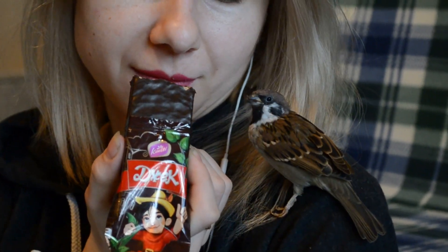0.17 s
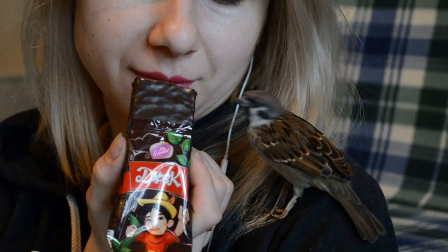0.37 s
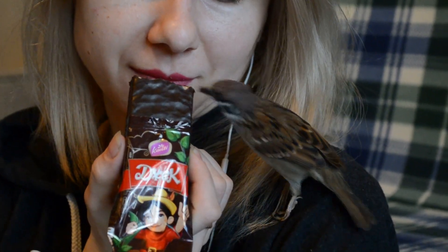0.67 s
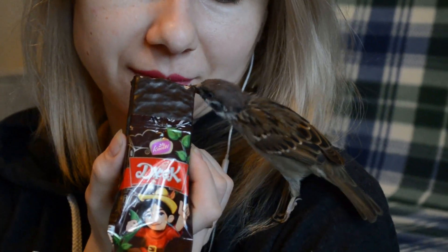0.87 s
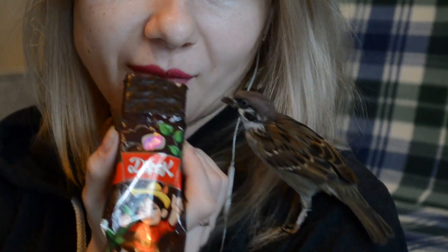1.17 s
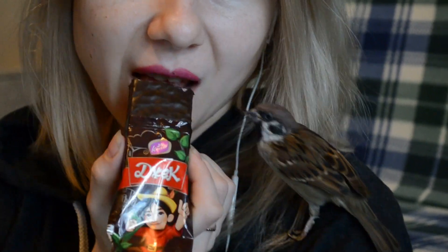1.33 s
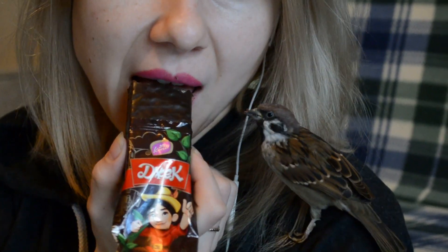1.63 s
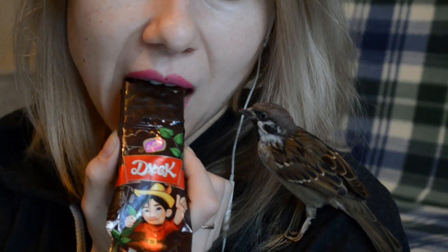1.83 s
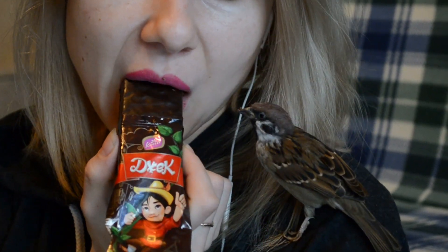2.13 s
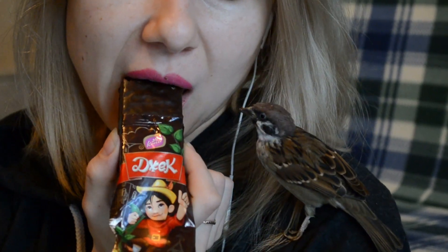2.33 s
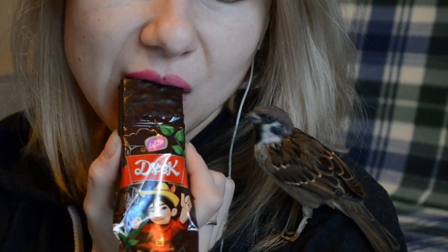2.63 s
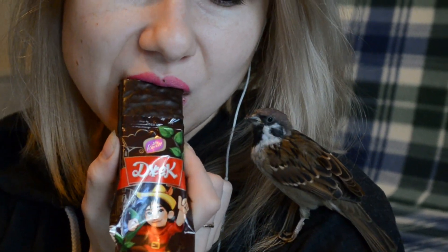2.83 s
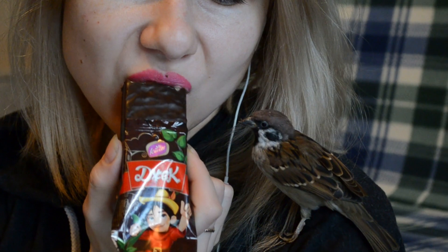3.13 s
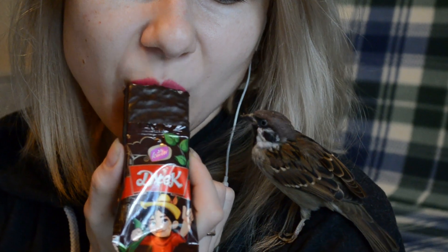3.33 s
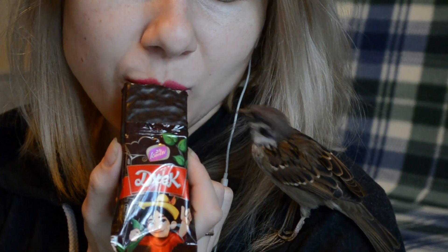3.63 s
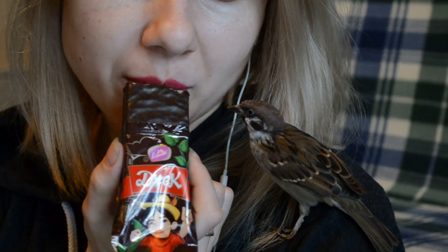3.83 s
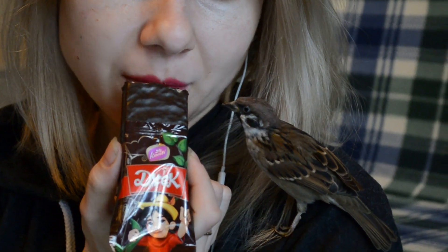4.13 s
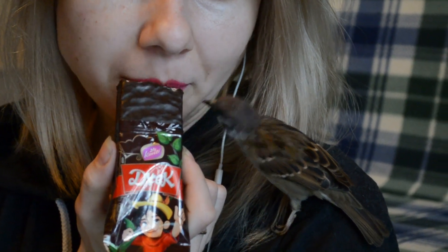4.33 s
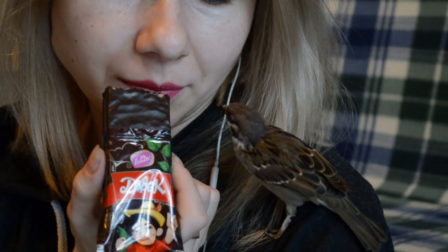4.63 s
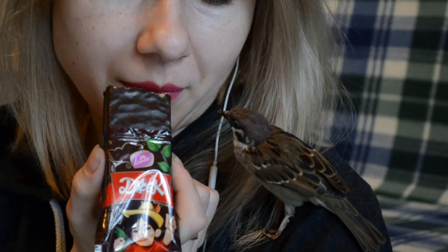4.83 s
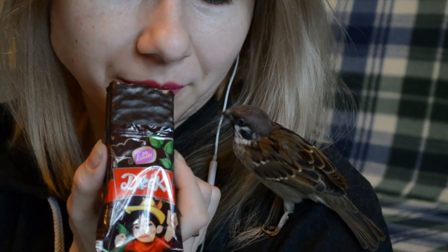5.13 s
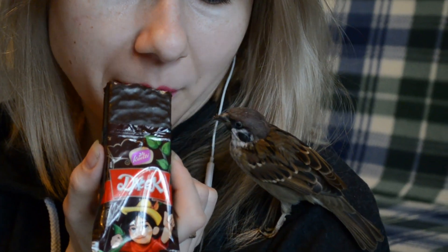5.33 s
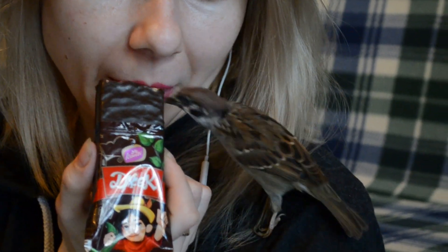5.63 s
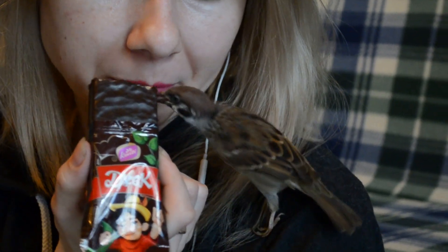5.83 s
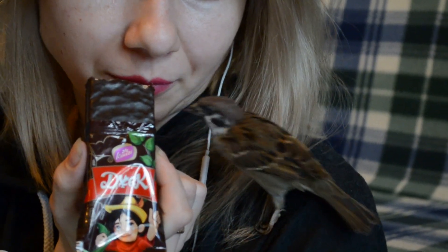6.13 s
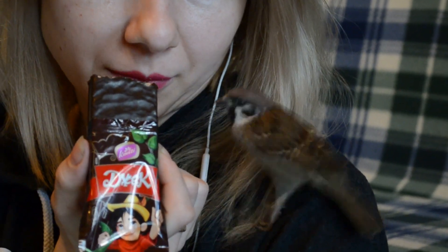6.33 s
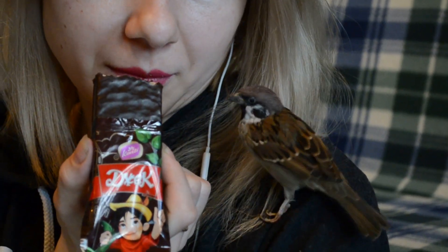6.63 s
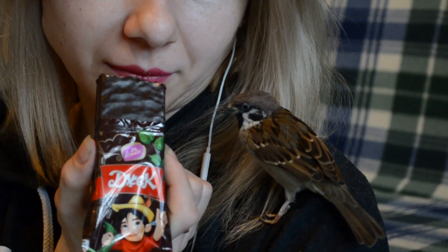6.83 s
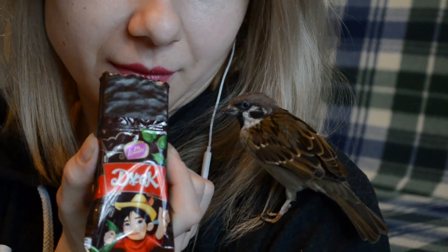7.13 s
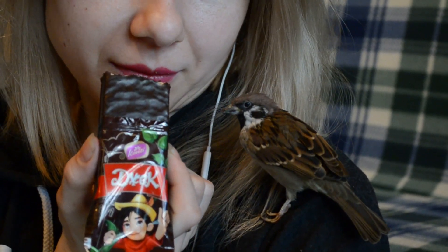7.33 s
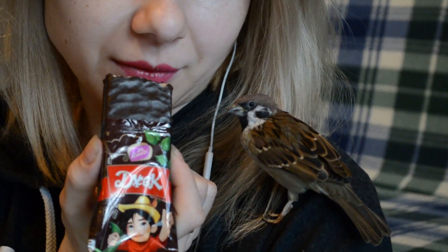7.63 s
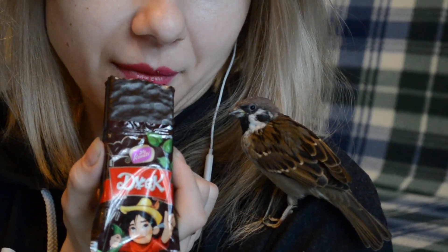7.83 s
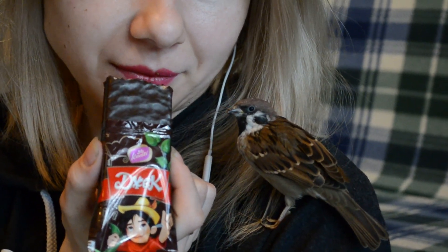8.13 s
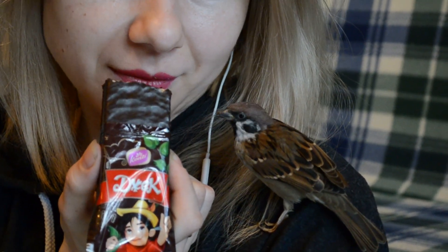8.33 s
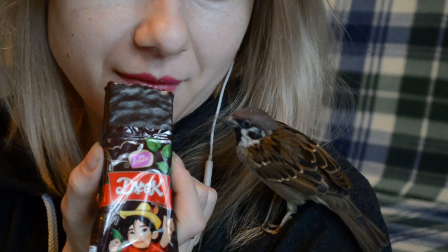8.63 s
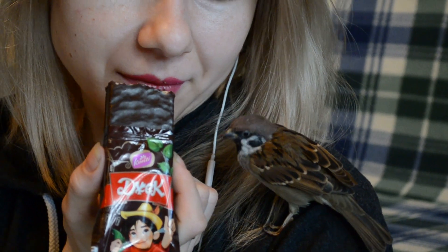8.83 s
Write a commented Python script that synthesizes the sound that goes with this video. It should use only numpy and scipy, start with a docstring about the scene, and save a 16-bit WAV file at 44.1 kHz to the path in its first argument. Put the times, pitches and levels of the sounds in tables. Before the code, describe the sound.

Sharp, high sparrow chirps sound up close in a small room, with soft beak clicks, a little foil crackle and a quiet hum.

```python
"""A sparrow in a small room

A tame sparrow chirps an arm's length away in a furnished room. Both halves of its voice box
(the syrinx) whistle at once and share one quick warble. Ticks of beak and foil and some duller
clicks fall between the chirps, over the rush and wandering whine of a small fan."""
import sys
import numpy as np
from scipy import signal
from scipy.fft import rfft, irfft, next_fast_len
from scipy.io import wavfile
from scipy.ndimage import uniform_filter1d

SR = 44100
rng = np.random.default_rng(int(sys.argv[2]) if len(sys.argv) > 2 else 0)


def pcm_store(signal):
    """Save signal as 16-bit PCM."""
    levels = np.round(np.clip(np.atleast_2d(signal), -1, 1) * 32767)
    wavfile.write(sys.argv[1], SR, levels.astype(np.int16).T)


N = 396459


def sparrow_chirps():
    """Nine chirps, each sung by a low and a high voice: the two halves of the voice box."""
    # Each voice after the chirp's opening, one list per chirp: time_s, pitch_hz, level_db
    low_voices = [
        [(1.362, 4056, -24.5), (1.377, 3242, -35), (1.39, 3457, -45), (1.4, 3996, -40.5), (1.41, 4150, -38.5),
         (1.421, 4260, -44)],
        [(2.722, 4186, -20), (2.738, 3347, -30.5), (2.749, 3674, -40.5), (2.772, 3680, -35.5), (2.8, 4080, -49)],
        [(3.256, 4102, -23), (3.268, 4010, -23), (3.285, 3954, -38)],
        [(4.716, 4103, -19), (4.726, 3653, -39.5), (4.737, 3380, -33), (4.77, 3550, -36), (4.782, 3713, -30.5),
         (4.795, 4056, -27), (4.815, 4260, -39)],
        [(5.035, 4450, -37.5), (5.05, 4270, -40), (5.06, 3935, -33), (5.068, 4590, -29), (5.074, 4400, -44),
         (5.087, 4970, -55), (5.092, 5500, -43)],
        [(6.313, 4220, -23), (6.322, 4260, -22.5), (6.33, 3780, -31.5), (6.338, 3288, -24.5),
         (6.349, 3554, -50), (6.375, 3466, -58.5), (6.41, 3790, -39.5)],
        [(6.82, 4000, -16.5), (6.83, 3024, -36), (6.85, 3235, -47.5), (6.865, 3670, -45), (6.88, 3300, -29)],
        [(8.475, 4355, -25.5), (8.5, 3810, -20), (8.51, 4126, -31), (8.52, 4132, -23.5), (8.533, 4350, -20.5),
         (8.55, 4800, -50)],
        [(8.71, 4283, -17), (8.731, 4350, -21.5), (8.742, 4340, -30), (8.75, 4260, -58)],
    ]
    high_voices = [
        [(1.351, 6250, -27), (1.362, 6430, -28), (1.371, 6480, -26), (1.374, 6200, -40), (1.378, 4300, -42),
         (1.402, 4050, -39.5), (1.415, 4320, -40)],
        [(2.7, 6100, -29), (2.717, 6340, -27), (2.728, 5290, -31), (2.745, 3890, -43), (2.775, 3900, -32),
         (2.795, 5120, -31), (2.81, 4500, -39), (2.825, 4680, -35.5), (2.84, 4650, -31.5)],
        [(3.243, 6330, -34.5), (3.26, 6050, -28), (3.275, 6120, -55.5)],
        [(4.692, 6600, -34.5), (4.703, 6000, -30), (4.714, 6450, -36.5), (4.722, 4400, -31.5),
         (4.74, 4000, -65), (4.755, 4270, -67), (4.774, 4300, -26), (4.783, 5290, -37), (4.795, 4590, -26),
         (4.81, 4330, -37.5)],
        [(5.037, 5950, -38.5), (5.06, 5690, -33), (5.07, 6400, -28), (5.074, 6500, -55), (5.085, 6370, -44),
         (5.092, 5450, -24), (5.103, 5080, -35.5), (5.12, 4940, -36)],
        [(6.304, 6170, -31), (6.32, 6250, -24.5), (6.328, 5210, -39), (6.345, 3970, -45), (6.38, 3920, -34.5),
         (6.392, 5190, -38), (6.4, 4280, -34), (6.41, 4200, -34)],
        [(6.799, 6350, -33), (6.812, 6310, -29), (6.823, 4780, -30.5), (6.84, 3950, -36.5),
         (6.854, 4030, -34.5), (6.866, 3637, -33.5), (6.874, 4260, -23), (6.878, 5130, -25.5),
         (6.885, 3960, -29), (6.897, 4780, -32)],
        [(8.467, 6490, -28.5), (8.48, 6230, -20), (8.495, 6340, -53), (8.527, 5900, -21), (8.538, 7150, -32),
         (8.548, 5930, -24.5), (8.563, 4350, -43)],
        [(8.7, 6050, -26.5), (8.715, 5920, -33), (8.73, 5660, -31), (8.742, 6200, -24), (8.757, 6530, -26.5),
         (8.766, 4950, -27.5), (8.777, 4470, -44)],
    ]
    # Each chirp's opening and tone colour (levels are relative to the voices):
    # start_s, arch_hz, overtone_db, sum_tone_db, undertone_db, air_db
    chirps = [(1.318, 4414, -11, -24.5, -29.5, -40.5), (2.679, 4376, -23.5, -26, -33, -40.5),
              (3.217, 4425, -31, -29, -38, -36), (4.67, 4406, -29.5, -29.5, -37.5, -39.5),
              (5.014, 4630, -31, -34.5, -32, -36), (6.279, 4380, -24.5, -25, -34.5, -38),
              (6.777, 4613, -29, -31.5, -33, -37.5), (8.442, 4720, -20, -24, -37.5, -38),
              (8.675, 4300, -19.5, -23, -45.5, -34)]
    # Each chirp's quick pitch swing: crest_s, rate_hz, slowing_s, stop_s, low_swing_hz, high_swing_hz
    warbles = [(1.356, 158, .05, 1.39, 310, 120), (2.7048, 165, .2, 2.74, 230, 200),
               (3.2485, 168, .1, 3.285, 260, 220), (4.6961, 160, .12, 4.735, 240, 230),
               (5.0517, 117, .31, 5.076, 150, 80), (6.3049, 180, .1, 6.345, 260, 200),
               (6.8066, 155, .047, 6.84, 260, 220), (8.472, 170, .09, 8.52, 250, 130),
               (8.7045, 155, .12, 8.75, 220, 110)]
    out = np.zeros(N + SR)
    for low, high, (start_s, arch_hz, *colour_db), warble in zip(low_voices, high_voices, chirps, warbles):
        first = int((start_s - .02) * SR)
        t = (first + np.arange(SR // 4)) / SR
        voices = two_voices(t, low, high, start_s, arch_hz, warble)
        out[first:first + len(t)] += mix_airflows(*voices, *colour_db)
    return out[:N]


def two_voices(t, low, high, start_s, arch_hz, warble):
    """The low voice pips, dips in level, then arches and swells; the high one joins. Both warble."""
    crest_s, rate_hz, slowing_s, stop_s, low_swing_hz, high_swing_hz = warble
    pip_hz, pip_db, dip_db = 4130, -48, -56
    join_hz, join_db = 6225, -45.5
    full_s, _, full_db = low[0]
    arch_s = (start_s + full_s) / 2
    low = [(start_s, pip_hz, pip_db), (min(start_s + .005, arch_s), pip_hz, dip_db),
           (arch_s, arch_hz, dip_db + .7 * (full_db - dip_db)), *low]
    high = [(start_s + .008, join_hz, join_db), *high]
    turns = rate_hz * slowing_s * (1 - np.exp((crest_s - t) / slowing_s))  # runs down like a spring
    depth = np.interp(t, [start_s, full_s, stop_s, stop_s + .01], [.45, 1, 1, 0])
    swing = depth * np.cos(2 * np.pi * turns)
    return whistle(low, t, low_swing_hz * swing), whistle(high, t, high_swing_hz * swing)


def whistle(points, t, warble_hz, wobble_hz=35, shimmer_db=2.2, edge_s=0.002):
    """Phase and strength of one vibrating membrane; it starts and stops within milliseconds."""
    time_s, pitch_hz, level_db = np.transpose(points)
    pitch = np.interp(t, time_s, pitch_hz) + warble_hz + wobble_hz * walk(500, len(t))
    gate = np.clip(np.minimum(t - time_s[0], time_s[-1] - t) / edge_s + 1, 0, 1) ** 2
    level = np.interp(t, time_s, level_db) + shimmer_db * walk(430, len(t))
    return 2 * np.pi * np.cumsum(pitch) / SR, np.sqrt(2) * gate * undb(level)


def mix_airflows(low, high, overtone_db, sum_tone_db, undertone_db, air_db):
    """Two whistles, the tones born where their airflows mix, a hoarse half-pitch tone and breath."""
    # Each extra tone's pitch adds up multiples of the two voices: times_low_pitch, times_high_pitch
    multiples = [(2, 0), (1, 1), (3, 0), (2, 1), (0, 2)]
    # What each of those tones adds to overtone_db or sum_tone_db: offset_db
    offsets = [2, -1, -25, -18.5, -9]
    (low_phase, low_amp), (high_phase, high_amp) = low, high

    def follow(amp, power=.75):
        """Follow a voice's strength loosely, so soft passages keep more of the added sound."""
        return low_amp.max() * (amp / low_amp.max()) ** power

    flutter = 0.35 + walk(901, len(low_amp))
    out = low_amp * np.sin(low_phase) + high_amp * np.sin(high_phase)
    out += undb(undertone_db) * follow(low_amp) * flutter * np.sin(low_phase / 2)
    for (m, n), offset_db in zip(multiples, offsets):
        gain = undb(offset_db + (sum_tone_db if n else overtone_db))
        joint_amp = (low_amp ** m * high_amp ** n) ** (1 / (m + n))
        out += gain * follow(joint_amp) * np.sin(m * low_phase + n * high_phase)
    noise = rng.standard_normal(len(out))
    air = unit(band(band(noise, 6600, 3400), 6600, 3400))
    air += undb(10) * unit(band(band(noise, 5200, 2600), 5200, 2600))
    air += undb(-8.5) * unit(band(noise, 1900, 1100))
    return out + undb(air_db) * follow(low_amp + high_amp, power=.5) * air


def sparrow_peeps():
    """Soft peeps from one voice: a short bending whistle and its octave, strongest at the bend."""
    # One row per peep: start_s, length_s, share_before_bend, first_hz, bend_hz, last_hz,
    # level_db, octave_db (relative to the whistle)
    peeps = [(0.954, 0.019, 0.23, 2900, 2330, 2096, -48, -38),
             (1.438, 0.0027, .5, 4400, 5130, 4530, -32, -12), (5, 0.02, 0.27, 4600, 5400, 4700, -48, -19)]
    out = np.zeros(N + SR)
    for start_s, length_s, share, first_hz, bend_hz, last_hz, level_db, octave_db in peeps:
        first = int((start_s - .01) * SR)
        t = (first + np.arange(SR // 10)) / SR
        points = [(start_s, first_hz, level_db - 9.5), (start_s + share * length_s, bend_hz, level_db),
                  (start_s + length_s, last_hz, level_db - 4)]
        phase, amp = whistle(points, t, warble_hz=0)
        out[first:first + len(t)] += amp * (np.sin(phase) + undb(octave_db) * np.sin(2 * phase))
    return out[:N]


def bright_ticks():
    """Beak and foil make bright ticks, each with a weaker, lower thud."""
    # One row per tick: start_s, peak_db
    taps = [(0.7048, -41), (0.7138, -45), (0.7991, -43), (0.821, -45), (0.8939, -41), (1.1727, -58.5),
            (1.2326, -42.5), (1.2424, -42.5), (1.2764, -58), (2.3994, -52), (2.4488, -56), (2.4574, -47.5),
            (2.4967, -53.5), (2.5306, -44.5), (2.5626, -51), (2.5854, -48.5), (2.6045, -51), (2.615, -42),
            (2.6224, -46), (2.6479, -44), (4.2073, -55), (5.6017, -46), (5.6064, -41.5), (5.7259, -46.5),
            (5.8396, -44), (5.9034, -68), (5.9145, -49.5), (5.9888, -50)]
    hits = [(start_s, peak_db, 7130) for start_s, peak_db in taps]  # all ring at 7130 Hz
    return ticks(hits, width_hz=4000, side_hz=2200, side_db=-8.5, snap_s=.0012)


def dull_ticks():
    """Small, duller clicks, each ringing at its own pitch, with a faint bright edge."""
    # One row per click: start_s, peak_db, ring_hz
    clicks = [(.982, -42.5, 2200), (1.2645, -57.5, 1884), (1.31, -45.5, 1750), (1.31, -51.5, 4800),
              (4.3307, -50, 2400), (5.878, -55.5, 1670), (5.9594, -71, 2170), (6.122, -58, 4490),
              (6.6748, -45, 4800), (7.184, -55, 4093), (7.211, -45.5, 4100), (7.2374, -56.5, 4570),
              (7.7683, -44, 4290), (7.7882, -55.5, 4150)]
    return ticks(clicks, width_hz=600, side_hz=7500, side_db=-14.5, snap_s=.0018)


def ticks(hits, width_hz, side_hz, side_db, snap_s):
    """Each tick is a short snap of noise that rings one main band and a weaker side band."""
    out, t = np.zeros(N), np.arange(512) / SR
    for start_s, peak_db, ring_hz in hits:
        snap = rng.standard_normal(len(t)) * np.exp(-t / snap_s)
        ring, side = band(snap, ring_hz, width_hz), band(snap, side_hz, side_hz)
        tick = ring / abs(ring).max() + undb(side_db) * side / abs(side).max()
        first = int(start_s * SR)
        out[first:first + len(t)] += undb(peak_db) * tick
    return out


def foil_rustle(fade_db_per_s=399.5):
    """Creeping foil gives a dense crackle of tiny, uneven clicks."""
    # One row per rustle: start_s, length_s, level_db
    rustles = [(2.403, 0.32, -66.5), (5.876, 0.12, -71.5)]
    t = np.arange(N) / SR
    clicks = rng.standard_normal(N) * undb(3 * rng.exponential(size=N))
    clicks *= rng.random(N) < .03
    loudness = np.zeros(N)
    for start_s, length_s, level_db in rustles:
        outside_s = np.maximum(np.maximum(start_s - t, t - start_s - length_s), 0)
        loudness += undb(level_db - fade_db_per_s * outside_s)
    return unit(band(clicks, 4945, 7400)) * loudness


def knock(start_s=6.123, level_db=-42, pitch_hz=170, decay_s=.002):
    """One soft knock on the camera: a low tone that dies almost at once."""
    age_s = np.maximum(np.arange(N) / SR - start_s, 0)
    return undb(level_db) * np.sin(2 * np.pi * pitch_hz * age_s) * np.exp(-age_s / decay_s)


def room_echo(sound, level_db=-6.5, gap_s=.0045):
    """Dense reflections arrive after a tiny gap; each band dies away at its own rate."""
    # Time the echo takes to fall by 60 dB: pitch_hz, fade_s
    fade_times = [(500, 0.58), (2700, 0.42), (4000, 0.19), (6000, 0.34), (8000, 0.32), (12000, 0.2)]
    t = np.arange(SR // 2) / SR
    tail = np.zeros(len(t))
    for hz in 300 * np.sqrt(2) ** np.arange(12):
        fade_s = np.interp(hz, *np.transpose(fade_times))
        tail += band(rng.standard_normal(len(t)), hz, hz / 2) * 1000 ** (-t / fade_s)
    tail *= np.clip(t / gap_s - 1, 0, 1)
    return signal.fftconvolve(sound, tail * undb(level_db) / np.sqrt(np.sum(tail ** 2)))[:N]


def fan(rush_db=-62.5, whine_db=-72.5, octave_db=-76):
    """A steady, gently breathing rush of air, and a whine that drifts with the fan's load."""
    # Tone colour of the rushing air: pitch_hz, relative_db
    rush_shape = [(12, -43.5), (20, -17), (191, -8.5), (362, -7), (440, -2.5), (478, -6), (615, -10.5),
                  (747, -9), (1130, -11.5), (1230, -13), (1720, -16.5), (2540, -18.5), (5860, -29),
                  (7330, -29), (15500, -47.5)]
    # Path of the whine: time_s, pitch_hz
    whine_path = [(0, 611.4), (1.899, 614.5), (2.331, 633), (2.698, 631), (3.4, 641), (3.7, 607),
                  (4.802, 638.3), (5.4, 615.4), (9, 602)]
    size = next_fast_len(N)
    bins_hz = np.maximum(np.arange(size // 2 + 1) * SR / size, 1)
    shape_hz, shape_db = np.transpose(rush_shape)
    gains = undb(np.interp(np.log(bins_hz), np.log(shape_hz), shape_db))
    rush = irfft(rfft(rng.standard_normal(size)) * gains, size)[:N]
    pitch_hz = np.interp(np.arange(N) / SR, *np.transpose(whine_path)) + 0.65 * walk(13)
    phase = 2 * np.pi * np.cumsum(pitch_hz) / SR
    whine = sum(np.sqrt(2) * undb(db + 2.3 * walk(6)) * np.sin(multiple * phase)
                for multiple, db in [(1, whine_db), (2, octave_db)])
    return unit(rush) * undb(rush_db + .5 * walk(0.79)) + whine


def undb(db):
    """Turn decibels into a gain."""
    return 10 ** (np.asarray(db) / 20)


def band(x, hz, width_hz):
    """A resonance that lets through the sound near one pitch, with gain 1 at its centre."""
    return signal.lfilter(*signal.iirpeak(hz, hz / width_hz, SR), x)


def unit(x):
    """Scale to an average strength (rms) of 1."""
    return x / np.sqrt(np.mean(x ** 2))


def walk(rate, size=N):
    """A smooth random wander of strength 1, turning about `rate` times a second."""
    span = int(SR / rate)
    return unit(uniform_filter1d(uniform_filter1d(rng.standard_normal(size), span), span))


def scene(treble_hz=9530):
    """The bird and small noises close by, their echo in the room, and the fan behind them."""
    near = sparrow_chirps() + sparrow_peeps() + bright_ticks() + dull_ticks() + foil_rustle() + knock()
    # Close sounds reach the microphone from the side and lose their highest treble.
    near = signal.sosfilt(signal.butter(3, treble_hz, fs=SR, output="sos"), near)
    return (near + room_echo(near) + fan())[None, :]


def record(dry):
    """The microphone's opening cancels sound in two narrow bands; the very top is cut off."""
    # The weakened bands: pitch_hz, width_hz, depth (0 to 1)
    notches = [(5740, 170, 1), (6990, 320, 0.2)]
    top_hz = 15700
    for pitch_hz, width_hz, depth in notches:
        dry = dry - depth * band(dry, pitch_hz, width_hz)
    return signal.sosfilt(signal.ellip(10, .2, 60, top_hz, fs=SR, output="sos"), dry)


dry = scene()
out = record(dry)
pcm_store(out)
```